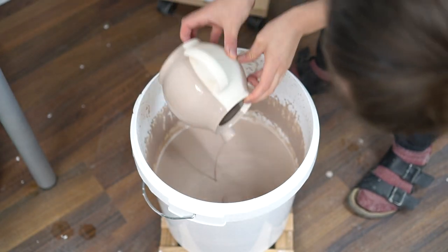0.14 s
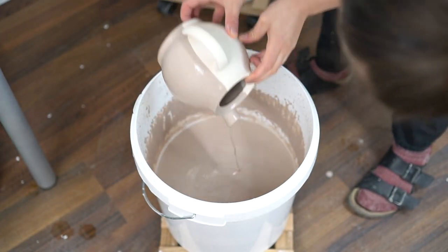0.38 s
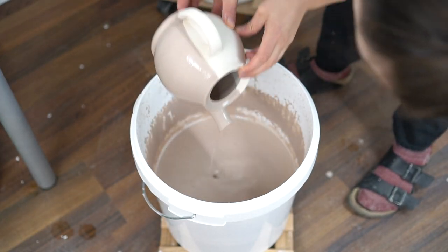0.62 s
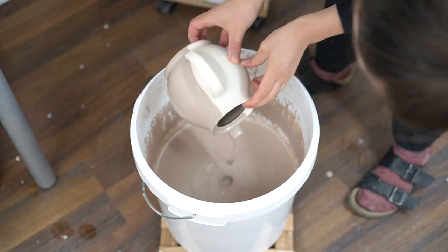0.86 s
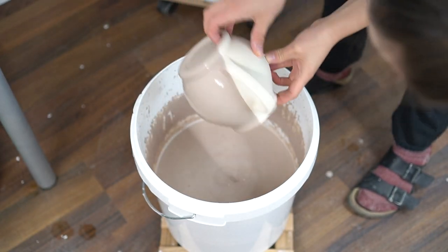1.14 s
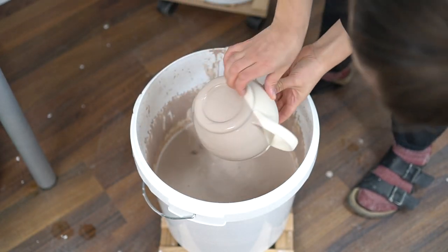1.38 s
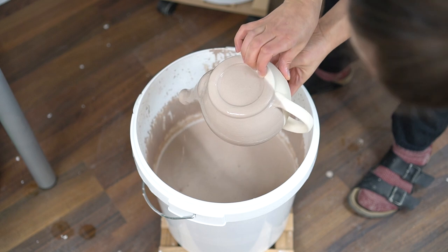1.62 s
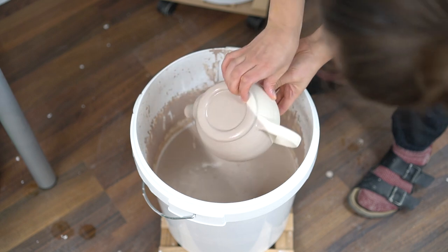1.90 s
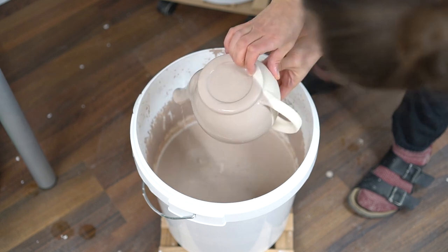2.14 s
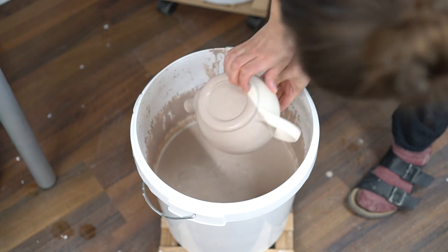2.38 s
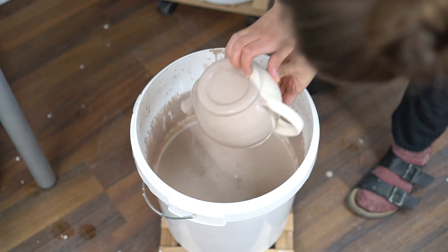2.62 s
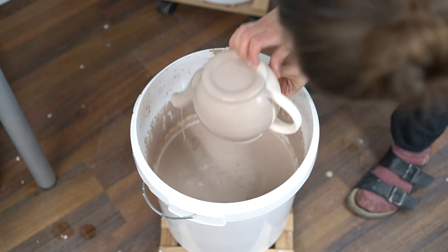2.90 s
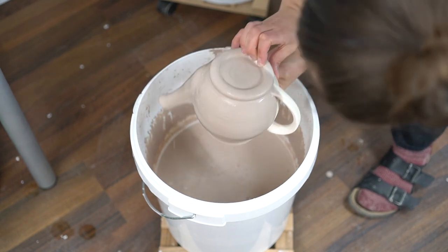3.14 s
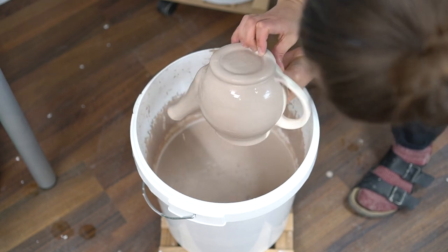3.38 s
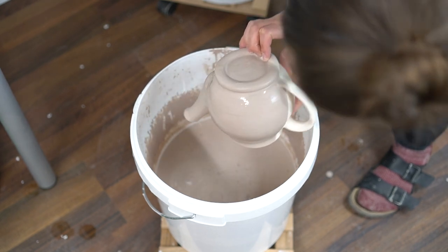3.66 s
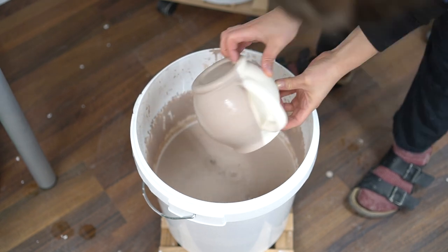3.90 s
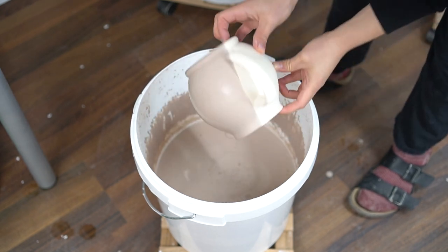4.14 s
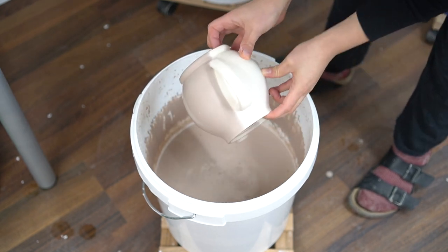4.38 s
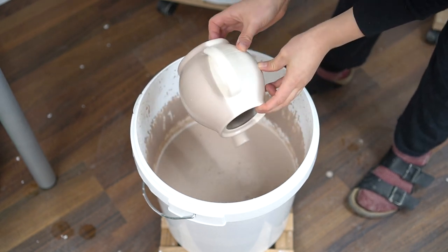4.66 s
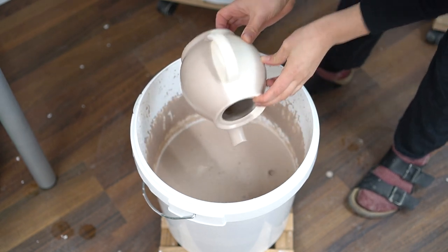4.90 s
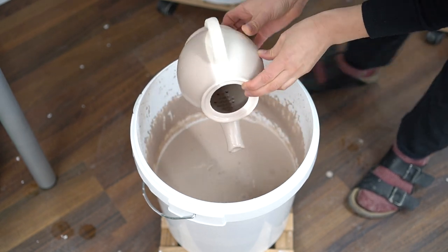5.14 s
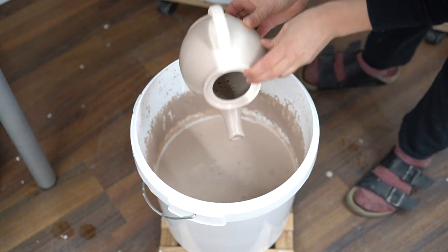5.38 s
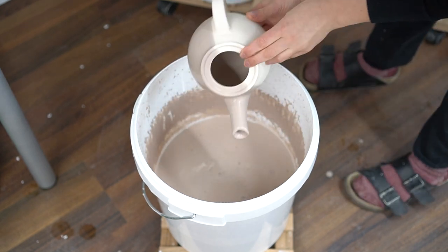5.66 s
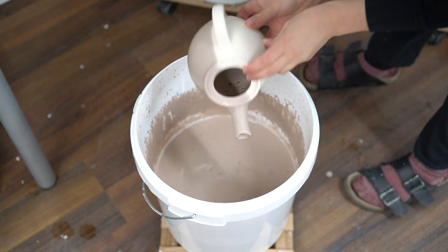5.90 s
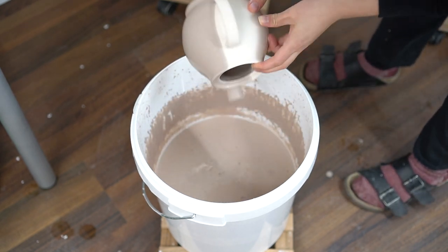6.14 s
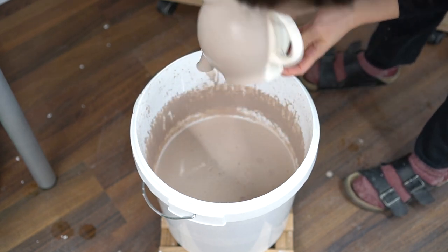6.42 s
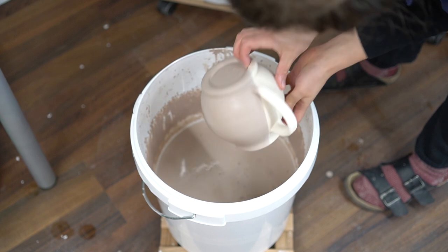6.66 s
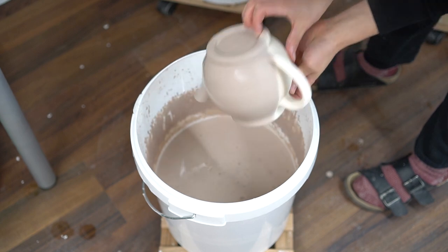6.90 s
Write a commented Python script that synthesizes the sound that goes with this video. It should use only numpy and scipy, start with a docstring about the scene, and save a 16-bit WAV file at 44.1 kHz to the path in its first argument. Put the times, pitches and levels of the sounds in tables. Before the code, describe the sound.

Glaze drops tick and burble into a bucket in a bare room, followed by quiet cloth rustle, faint ceramic touches and a sandal scuff.

```python
"""Thick glaze drips from an upturned pot into a plastic bucket in a bare workshop.
Room air (shaped noise) and mains hum (wavering sines) lie under it all. From the start drops tick (noise snaps)
and plink (bubble sines rising in pitch), slops burble as crowded bubbles, and clothes rustle in soft noise.
From 2.3 s fingers brush (puffs of band noise) and the gripped pot rings faintly (decaying modes).
Past 5 s a sandal scuffs twice (grainy noise) over a rumbling wooden floor; then the hand brushes and grips again."""
import sys
import numpy as np
from scipy import signal
from scipy.fft import rfft, irfft, next_fast_len
from scipy.io import wavfile
from scipy.ndimage import map_coordinates

SR = 44100
rng = np.random.default_rng(int(sys.argv[2]) if len(sys.argv) > 2 else 0)


def how_loud(loudness_db):
    """Turn decibels into a plain amplitude multiplier (0 dB gives 1, 20 dB gives 10)."""
    steps = np.asarray(loudness_db, float) / 20
    return 10 ** steps


def wrap_up_sound(samples):
    """Save the sound to the file named by the first command line argument, as 16-bit audio."""
    columns = np.atleast_2d(samples).T
    # keep every value between -1 and 1, then stretch to whole-number steps
    tamed = np.clip(columns, -1, 1)
    steps = np.round(tamed * 32767).astype(np.int16)
    wavfile.write(sys.argv[1], SR, steps)


N = 310013  # samples in the scene


def unit(x):
    """Normalisation: the signal scaled to rms 1."""
    return x / np.sqrt(np.mean(x ** 2) + 1e-20)


def along(points, hz):
    """Interpolation of (Hz, value) points on a logarithmic frequency axis."""
    point_hz, value = np.transpose(points)
    return np.interp(np.log(hz + 1), np.log(point_hz + 1), value)


def curves(rows):
    """Linear interpolation in time: one value per sample for each column after the time."""
    s, *columns = np.transpose(rows)
    return [np.interp(np.arange(N) / SR, s, column) for column in columns]


def wobble(rate):
    """Slow random modulation: a smooth curve through `rate` random knots a second."""
    knots = rng.standard_normal(int(N * rate / SR) + 4)
    return map_coordinates(knots, [np.arange(N) * rate / SR])


def filtered(x, spectrum):
    """Linear filtering: each frequency is scaled by the (Hz, dB) points."""
    m = next_fast_len(N + 8192)
    gain = how_loud(along(spectrum, np.fft.rfftfreq(m, 1 / SR)))
    return irfft(rfft(x, m) * gain, m)[..., :N]


def coloured(x, spectrum):
    """Spectral shaping: x through the (Hz, dB) points, brought to rms 1."""
    return unit(filtered(x, spectrum))


def tail():
    """Reverberation: a diffuse answer builds up within ms, then each frequency decays at its own rate."""
    # reverberation time of the bare room: pitch_hz, t60_s
    decay = [(200, 0.75), (1400, 0.69), (3600, 0.61), (8000, 0.43), (15000, 0.17)]
    # colour of the reverberation at its outset: pitch_hz, level_db
    colour = [(200, -0.5), (1400, 3.5), (3600, 6), (8000, 5), (15000, 2)]
    hz, t, z = signal.stft(rng.standard_normal(SR * 3 // 4), SR, nperseg=256)
    fade_db = along(colour, hz)[:, None] - 60 * t / along(decay, hz)[:, None]
    answer = signal.istft(z * how_loud(fade_db), SR, nperseg=256)[1]
    build_up = 1 - np.exp(-np.arange(len(answer)) / SR / 0.00043)
    answer = answer * build_up
    return answer / np.linalg.norm(answer)


def air():
    """Stationary background: broadband room noise and mains harmonics wavering in level and phase."""
    # hum partials: pitch_hz, level_db (rms)
    partials = [(100, -69), (148, -78), (395, -86.5), (512, -87)]
    # spectrum of the room air: pitch_hz, relative_db
    spectrum = [(12, -45), (25, -17), (69, -14.5), (102, -18.5), (200, -11), (260, -17), (520, -23),
                (700, -25), (1300, -23.5), (2100, -30.5), (2800, -29), (3600, -29), (4700, -33.5),
                (8000, -36), (15200, -33), (16500, -57)]
    t = np.arange(N) / SR
    hum = np.zeros(N)
    for hz, db in partials:
        level = np.sqrt(2) * how_loud(db + 0.13 * wobble(3.6))
        hum += level * np.sin(2 * np.pi * hz * t + 0.62 * wobble(1.16))
    noise_level = how_loud(-69.5 + 0.11 * wobble(2.58))
    return hum + noise_level * coloured(rng.standard_normal(N), spectrum)


def slops():
    """Bubble cluster: a fold of glaze traps many bubbles at once, given as rows like those of the drops."""
    # slops of glaze folding in: start_s, length_s, bubble_db, middle_hz
    folds = [(-0.04, .05, -50.5, 624), (0.44, .05, -51.5, 1020), (0.648, .13, -51.5, 3260),
             (1.051, .11, -59, 4960)]
    bubbles = 14  # in each slop
    spread_octaves, life_cycles = 0.53, 3.35
    s, length, db, hz = np.transpose(folds)[:, :, None]
    place = rng.random((len(folds), bubbles))
    size_luck, pitch_luck = rng.standard_normal((2, len(folds), bubbles))
    times = s + length * (np.arange(bubbles) + place) / bubbles
    size_db = db + 2.6 * size_luck
    pitch_hz = hz * 2 ** (spread_octaves * pitch_luck)
    rows = [times, size_db, pitch_hz, np.full(times.shape, life_cycles), size_db - 25]
    return np.reshape(rows, (len(rows), -1)).T


def drops():
    """Bubble resonance: an impact ticks, and a trapped bubble rings, climbs a little in pitch and bursts."""
    # drops that stand out: start_s, bubble_db (before its decay), nominal_hz, life_cycles, tick_db
    single_drops = [(-0.03, -48.5, 267, 11, -37.5), (-0.02, -45.5, 335, 12.7, -60),
                    (-0.02, -32.5, 2140, 3.3, -62), (-0.015, -50, 463, 6.2, -70),
                    (0.0613, -54, 13420, 5.5, -53), (0.1339, -40, 14500, 4.4, -49),
                    (0.197, -38, 13000, 6.1, -41), (0.2417, -48, 1160, 2.2, -55),
                    (0.2937, -64, 8500, 2.6, -43), (0.3048, -39, 3260, 1.8, -43),
                    (0.3052, -51.5, 2130, 11.5, -56), (0.3185, -31, 7060, 1.96, -46),
                    (0.455, -50.5, 160, 2.2, -88), (0.4745, -48, 2900, 5.7, -51),
                    (0.4955, -42, 4780, 5.8, -42), (0.4994, -35, 2700, 2, -45),
                    (0.5084, -36.5, 1610, 6.2, -69), (0.5425, -35.5, 6160, 7.6, -35.5),
                    (0.5585, -40, 1330, 13, -58), (0.5697, -41, 7600, 3.8, -35.5),
                    (0.5974, -33, 7360, 14, -37), (0.6087, -39, 12350, 6, -42),
                    (0.644, -37, 4840, 4.4, -60), (0.6526, -44, 3860, 3.5, -38.5),
                    (0.6609, -40, 3150, 14, -39), (0.6745, -42, 5400, 7.8, -67),
                    (0.6807, -33, 9100, 3.4, -34), (0.6874, -35.5, 2730, 7.9, -51),
                    (0.705, -36.5, 3380, 10.5, -40), (0.7196, -30.5, 10950, 7.7, -31),
                    (0.7334, -35.5, 5070, 6.6, -53), (0.7684, -36, 3680, 5, -61),
                    (0.7874, -36, 2440, 10.4, -42), (0.8337, -42, 15400, 6.5, -45),
                    (0.8771, -36.5, 11900, 4.6, -45.5), (0.9958, -41, 9100, 5.6, -44),
                    (1.0112, -45.5, 2110, 13.6, -69), (1.0374, -46.5, 7250, 8.9, -45),
                    (1.062, -65, 3420, 62, -75), (1.064, -61, 5300, 30, -73), (1.2331, -52, 13780, 6, -62),
                    (1.371, -29, 2610, 1.94, -35), (1.374, -36.5, 8500, 5.3, -75),
                    (1.3838, -42.5, 2043, 25, -42), (1.385, -56.5, 247, 9.9, -80),
                    (1.3974, -34.5, 1350, 8.3, -62), (1.4113, -36.5, 8900, 6.4, -43),
                    (1.4207, -36.5, 5300, 2.7, -45), (1.4791, -51, 14300, 3.4, -35),
                    (1.4955, -45, 2700, 13, -70), (1.4959, -36, 3880, 5.7, -38), (1.51, -48, 13000, 6, -43),
                    (1.6585, -54, 6640, 10, -60), (1.6985, -47, 4970, 7.1, -48),
                    (1.7552, -48, 7770, 8.1, -46), (1.7697, -62, 3530, 18, -90),
                    (2.0494, -47.5, 8830, 6.7, -67), (2.333, -45.5, 3730, 7.3, -72),
                    (2.4931, -40, 13900, 6, -54), (2.5409, -39, 15300, 7.9, -53),
                    (3.1077, -27.5, 3330, 9.5, -46), (3.6034, -49.5, 4900, 2.5, -53.5),
                    (3.9776, -58, 1070, 3.4, -74), (4.2984, -44, 12700, 6.8, -40),
                    (4.299, -36.5, 5140, 1.4, -72), (6.801, -68, 3060, 5, -73)]
    lead = SR // 10  # room for drops that fall before the scene opens
    out = np.zeros(lead + N + SR)
    t = np.arange(SR // 20) / SR
    rooms = [tail() for _ in range(8)]
    for k, (s, db, hz, cycles, tick_db) in enumerate([*single_drops, *slops(), *spatter()]):
        age = t * hz / max(cycles, 1)  # 1 when the bubble bursts
        onset = 1 - np.exp(-t * hz / 0.28)
        life = onset * np.exp(-0.55 * age) / (1 + age ** 6)
        climb = 1 + 0.022 * (np.minimum(age, 2) - 1)
        bubble = how_loud(db) * life * np.sin(2 * np.pi * hz * t * climb)
        snap = rng.standard_normal(len(t) + 1) * how_loud(-60 * np.append(t, 1) / 0.0037)
        tick = how_loud(tick_db) * (snap[1:] - 0.6 * snap[:-1])  # differencing leaves little bass
        sound = bubble + tick
        sound[52:] -= 0.052 * sound[:-52]  # the bucket wall answers at once
        # less is sent into the room for longer-lived, higher and louder bubbles
        send_db = -2 - 1.26 * np.log2(max(cycles, 1) / 6)
        send_db -= 0.33 * np.log2(hz / 3000) + 0.13 * (db + 41)
        wet = how_loud(send_db) * signal.fftconvolve(sound, rooms[k % len(rooms)])
        wet[:len(t)] += sound
        out[lead + round(s * SR):][:len(wet)] += wet
    return out[lead:lead + N]


def spatter():
    """Random arrivals at a changing rate: small drops, given as rows like those of the drops."""
    # density of the small drops: time_s, rate_per_s
    density = [(0.4, 0), (0.46, 60), (0.72, 50), (0.8, 8), (1.3, 8), (1.42, 25), (1.7, 6), (1.8, 0)]
    bubble_db, middle_hz, spread_octaves, life_cycles = -54.5, 8000, 0.71, 6
    rate, = curves(density)
    passed = np.cumsum(rate) / SR  # drops fallen so far
    count = int(passed[-1])
    place, luck = rng.random(count), rng.standard_normal(count)
    s = np.searchsorted(passed, np.arange(count) + place) / SR
    hz = np.clip(middle_hz * 2 ** (spread_octaves * luck), 700, 15000)
    db = np.full(count, bubble_db)
    return np.c_[s, db, hz, np.full(count, life_cycles), db - 8]


def rustle():
    """Friction noise of cloth and skin: a dull and a crisp band swell with each move."""
    # sleeves, hands and feet shifting: time_s, dull_db, crisp_db
    moves = [(0.92, -100, -112), (1.08, -71, -61.5), (1.35, -85, -82), (1.5, -96, -82), (1.87, -103, -82),
             (2.22, -97, -105), (2.36, -69, -70), (2.62, -73.5, -89), (2.8, -68.5, -78), (2.97, -77, -79.5),
             (3.12, -65.5, -67), (3.58, -85, -86.5), (3.98, -67.5, -71.5), (4.3, -76, -77),
             (4.62, -69.5, -77), (4.83, -68, -81), (4.97, -68.5, -81), (5.8, -70.5, -73),
             (6.36, -77.5, -82.5), (6.58, -72.5, -72), (7.0, -74, -77)]
    # spectrum of the dull noise: pitch_hz, relative_db
    dull_spectrum = [(150, -31), (300, 2), (1000, -1), (2200, -3.5), (3500, -7.5), (5000, -76)]
    # spectrum of the crisp noise: pitch_hz, relative_db
    crisp_spectrum = [(1500, -47), (2600, -10), (3600, -2.5), (5000, -7), (8000, -11.5), (15000, -21)]
    dull_db, crisp_db = curves(moves)
    dull = how_loud(dull_db + 1.85 * wobble(25)) * coloured(rng.standard_normal(N), dull_spectrum)
    crisp = how_loud(crisp_db + 0.29 * wobble(45)) * coloured(rng.standard_normal(N), crisp_spectrum)
    return dull + crisp


def brushes():
    """Brief friction: each brush is a quick grainy puff of band-limited noise, with its reverberation."""
    # short brushes of finger or cloth: start_s, nominal level_db, length_s, lowest_hz, highest_hz
    strokes = [(2.328, -55, 0.012, 890, 13800), (2.361, -55.5, 0.007, 3060, 14900),
               (2.843, -70.5, 0.067, 2960, 11400), (3.673, -73, .01, 9000, 15500),
               (4.089, -69, 0.026, 3040, 8900), (4.68, -66.5, 0.16, 1230, 4140),
               (4.882, -73, .01, 6000, 14000), (5, -68.5, 0.064, 3200, 8200),
               (5.906, -71, 0.021, 5500, 9450), (5.979, -63.5, 0.048, 3630, 10400),
               (6.112, -59, 0.01, 2730, 11900)]
    dry, t = np.zeros(N), np.arange(N) / SR
    for s, db, length, low_hz, high_hz in strokes:
        u = np.clip((t - s) / length, 0, 30)
        puff = 2 * np.sqrt(u) * np.exp(-2 * u * u)
        grain = how_loud(db + 0.67 * wobble(400))
        band = [(low_hz * 0.45, -30), (low_hz, 0), (high_hz, -5), (high_hz * 1.7, -30)]
        dry += grain * puff * coloured(rng.standard_normal(N), band)
    return dry + how_loud(-2.0) * signal.fftconvolve(dry, tail())[:N]


def pot():
    """Modal excitation: each grip rings the pot, mostly in the modes nearest to its best-driven pitch."""
    # modes of the fired pot: pitch_hz, relative_db, t60_s
    pot_modes = [(1233, -3, .1), (1403, -1, .55), (1938, -3, .3), (2805, 0, .3), (3190, -6, .18),
                 (3470, -5, .15), (3790, -7, .12), (4700, -2, .2), (5500, -5, .1), (6500, -7, .08),
                 (6950, -4, .1), (8250, -5, .1)]
    # fingers shifting their grip: start_s, level_db, best_driven_hz, spread_octaves, contact_s
    grips = [(2.332, -62, 1450, 0.42, 0.00077), (2.362, -62.5, 5030, 0.43, 0.0029),
             (5.91, -76, 3500, 1.4, .005), (5.984, -72, 6000, 0.5, .01), (6.111, -71, 4600, 1.1, 0.0027),
             (6.136, -69, 1940, 0.29, 0.0089), (6.537, -66, 2820, 0.38, .01),
             (6.58, -70, 2750, 0.43, 0.011), (6.949, -65, 2750, 0.42, 0.0097)]
    dry, t = np.zeros(N + SR), np.arange(SR // 2) / SR
    hz, mode_db, t60 = np.transpose(pot_modes)[:, :, None]
    chance = rng.standard_normal((len(grips), len(pot_modes), 1))
    for (s, db, best_hz, spread, contact), luck in zip(grips, chance):
        drive_db = db + mode_db + 0.86 * luck - 6 * (np.log2(hz / best_hz) / spread) ** 2
        modes = how_loud(drive_db - 60 * t / t60) * np.sin(2 * np.pi * hz * t + 3 * luck)
        onset = 1 - np.exp(-t / contact)
        dry[round(s * SR):][:len(t)] += onset * modes.sum(axis=0)
    return dry[:N] + signal.fftconvolve(dry, tail())[:N]


def tread():
    """Flexural rumble: the floor boards give low noise while weight shifts."""
    # boards flexing under shifted weight: start_s, level_db, fade_s (time constant)
    flexes = [(5.06, -68, 0.035), (5.28, -61.5, 0.16), (5.55, -69.5, .1)]
    rise_s = 0.039
    t = np.arange(N) / SR
    level = np.zeros(N)
    for s, db, fade in flexes:
        rise = np.clip((t - s) / rise_s, 0, 1)
        level += how_loud(db) * rise * np.exp(-np.maximum(t - s - rise_s, 0) / fade)
    rumble = [(15, -18), (35, -20), (80, 0), (130, -23), (300, -67)]
    return level * coloured(rng.standard_normal(N), rumble)


def scuff():
    """Sliding friction: grit under the sole makes dense tiny slips, brighter while the foot moves fast."""
    # spectrum of the grit: pitch_hz, relative_db
    grit_spectrum = [(150, -25), (250, -20), (710, -10.5), (922, -11), (1470, -6), (1610, -8),
                     (2130, -13.5), (2400, -8.5), (3520, -6), (4730, -10), (9170, -17.5), (14200, -24),
                     (16000, -30)]
    # the sole's own resonance: pitch_hz, relative_db
    sole_resonance = [(1500, -48), (1900, 0), (2150, 3), (2300, -6), (2800, -38)]
    # sole dragged over the boards: start_s, peak_db, swell_s, hold_s, brightness_db (at full speed)
    drags = [(5.096, -36, 0.087, 0.092, 16), (5.426, -39.5, 0.04, 0.067, 5)]
    slips = rng.standard_normal(N) * how_loud(2.0 * wobble(900) + 1.3 * wobble(90))
    grit = coloured(slips, grit_spectrum)
    high = coloured(grit, [(900, -8.5), (14400, 6.5)])
    ring = how_loud(-15.5) * coloured(grit, sole_resonance)
    dry = np.zeros(N)
    for s, db, swell, hold, top_db in drags:
        u = np.arange(N) / SR - s
        rising = 1 - np.clip(u / swell, 0, 1)  # 1 at the start, 0 at full speed
        bite = np.clip(u / 0.022, 0, 1) ** 2  # the sole grips fast to just under its peak
        lift_db = 218 * np.maximum(u - swell - hold, 0)  # fade as the sole lifts
        level = bite * how_loud(db - 12 * rising - lift_db)
        # brightness rises with the swell, then sinks
        bright_db = top_db - 14 * rising - 120 * np.clip(u - swell, 0, 0.3)
        share = 1 / (1 + how_loud(-3 * bright_db + 12.5))  # share of the bright grit
        dry += level * ((1 - share) * grit + share * high + ring)
    return dry + how_loud(-1.5) * signal.fftconvolve(dry, tail())[:N]


def scene():
    """Superposition: the pressures of all sources add at one microphone, given on two equal channels."""
    mono = drops() + pot() + scuff() + tread() + brushes() + rustle() + air()
    return np.array([mono, mono])


def roll_off(x):
    """The treble ends steeply here."""
    return signal.sosfilt(signal.butter(12, 16640, fs=SR, output="sos"), x)


def record(dry):
    """Frequency response: the capsule lifts the presence band and drops the top of the treble."""
    # response of the microphone: pitch_hz, gain_db
    response = [(20, -3.5), (2700, -1.5), (3600, 2.5), (4600, -1), (12000, -4.5), (15600, -5.5),
                (16000, -39), (17000, -45)]
    heard = filtered(dry, response)
    return roll_off(heard)


dry = scene()
out = record(dry)
wrap_up_sound(out)
```